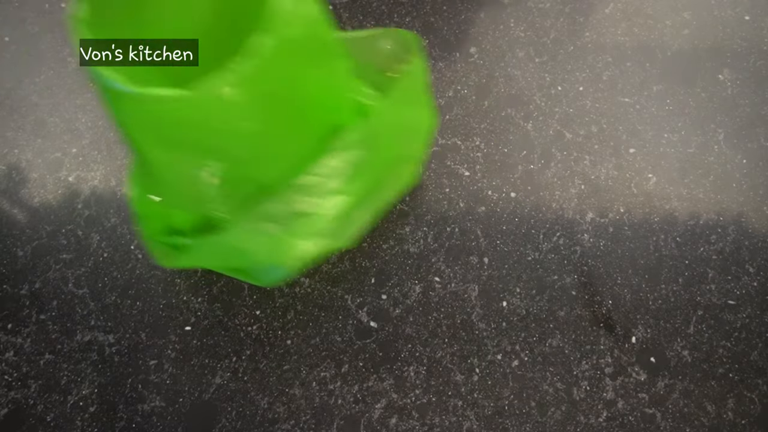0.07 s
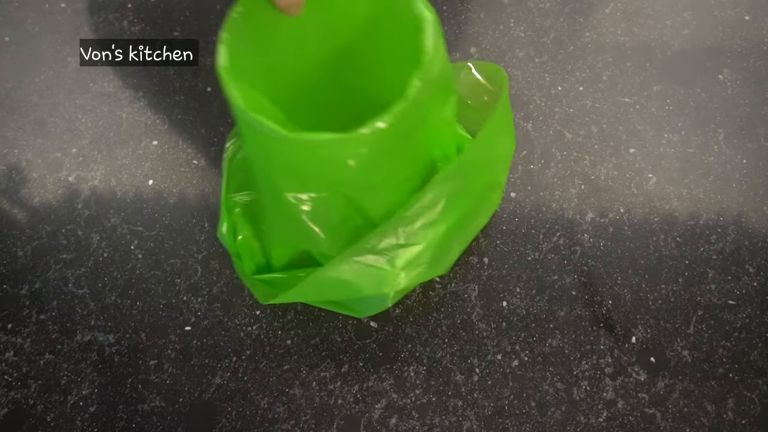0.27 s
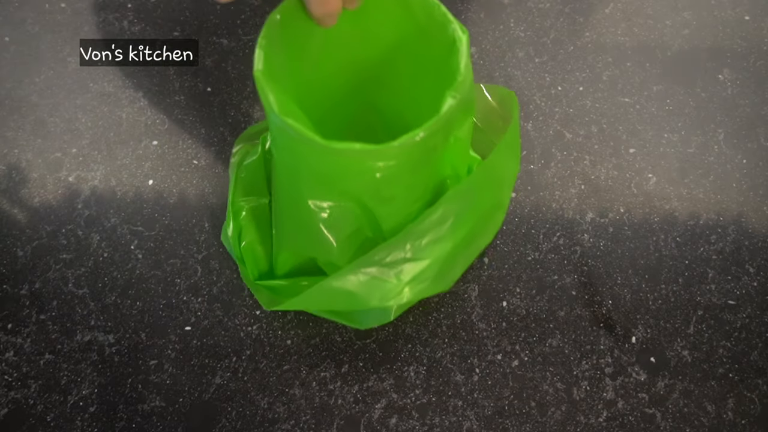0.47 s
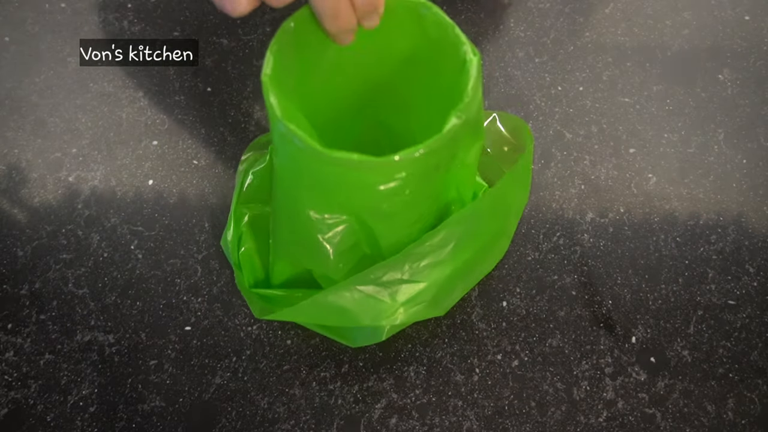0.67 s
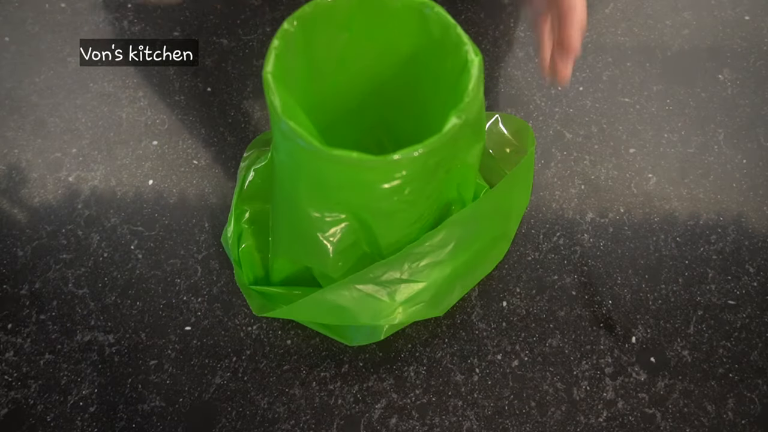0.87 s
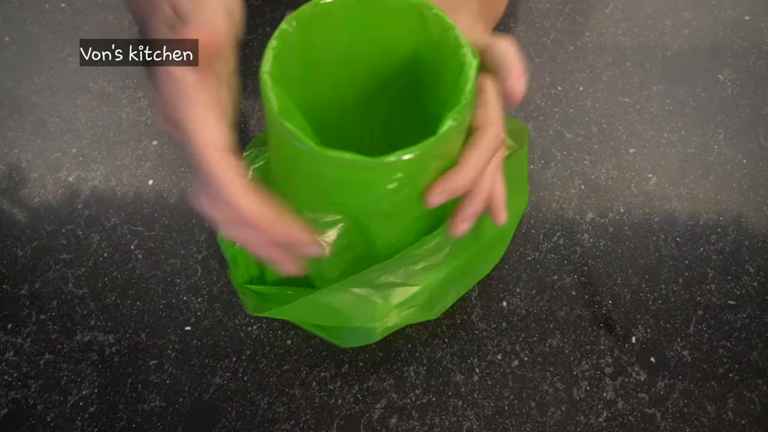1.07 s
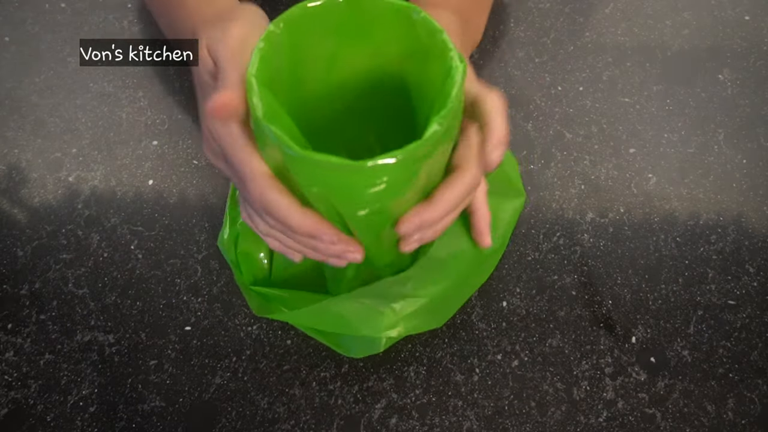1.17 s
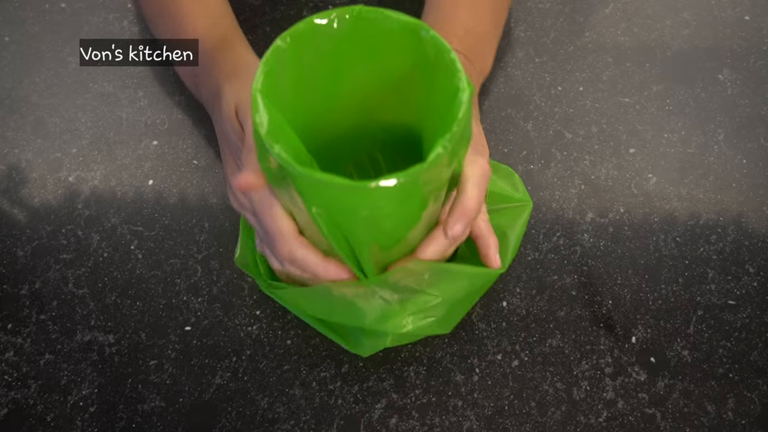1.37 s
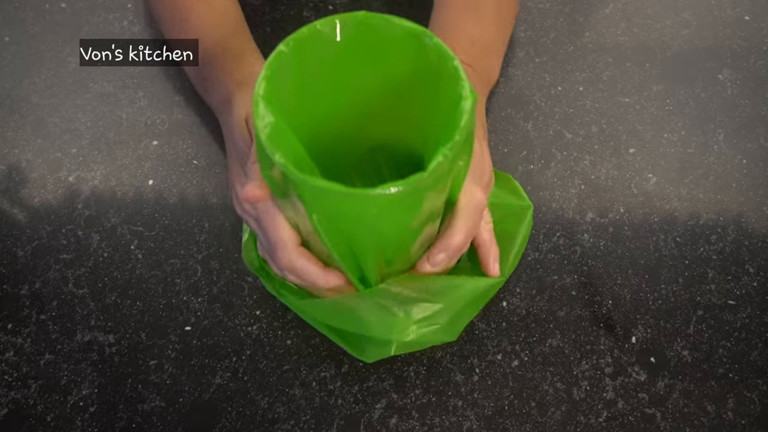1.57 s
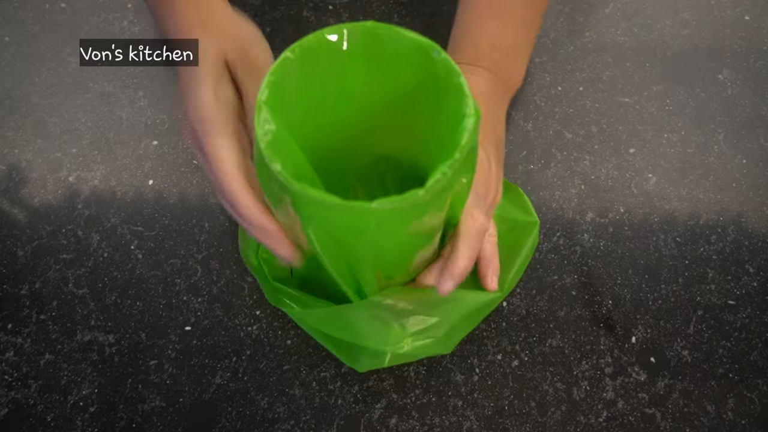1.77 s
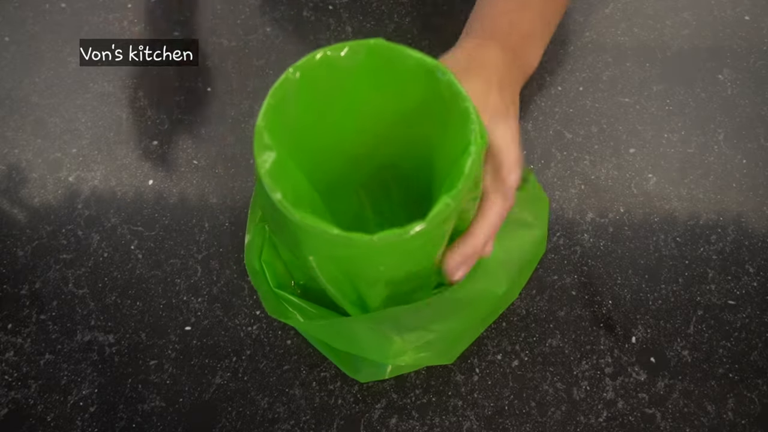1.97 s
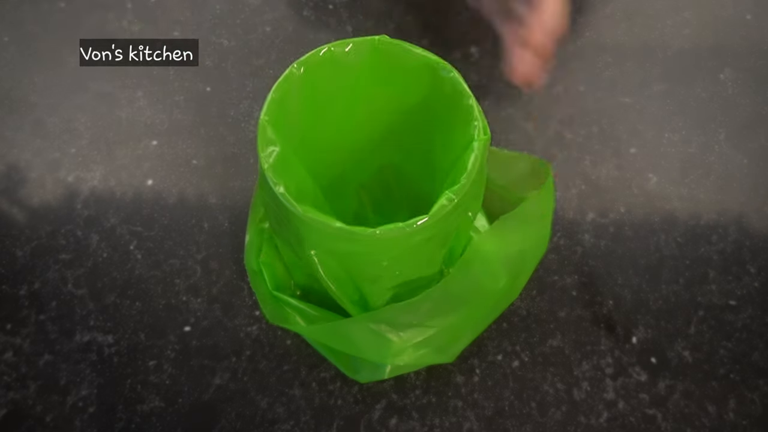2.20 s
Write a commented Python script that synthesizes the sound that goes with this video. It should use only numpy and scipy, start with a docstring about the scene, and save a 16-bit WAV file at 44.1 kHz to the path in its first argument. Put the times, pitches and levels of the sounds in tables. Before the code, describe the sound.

A cup taps and scrapes on a counter, then thin plastic film crackles under pressing hands

```python
"""In a quiet kitchen, over air noise and a faint hum, a bag-lined cup lands on a stone counter. It rings as a
few fading tones, then slides: rough noise shakes the same tones. Two hands press the thin plastic bag around
the cup: creases snap as short rings with bright bursts, over many tiny crackles and a rustle. The hands bump
softly against the cup with low thumps. Two close microphones listen from above, and the room answers with a
fading tail."""
import sys
import numpy as np
from scipy import signal
from scipy.fft import rfft, irfft, next_fast_len
from scipy.io import wavfile
from scipy.ndimage import uniform_filter1d, map_coordinates

SR = 44100
rng = np.random.default_rng(int(sys.argv[2]) if len(sys.argv) > 2 else 0)


def int16_out(signal):
    """Quantize to a 16-bit WAV file."""
    q = np.round(np.clip(np.atleast_2d(signal).T, -1, 1) * 32767)
    wavfile.write(sys.argv[1], SR, q.astype(np.int16))


def elevation(decibels):
    """Turn decibel levels (scalar or array-like) into linear amplitude ratios."""
    levels = np.asarray(decibels, float)
    return 10 ** (levels / 20)


N = 98607  # length [samples]

# Noise color of kitchen air and microphone hiss: (frequency [Hz], level per Hz [dB])
AIR_COLOR = [(25, -23), (55, -5), (130, -10), (350, -10.5), (700, -21), (3000, -24.5), (16000, -34.5)]
# How alike the air is at left and right: (frequency [Hz], likeness [0 to 1])
AIR_LIKENESS = [(300, .99), (3000, .5)]
AIR_DB = -55
HUM_HZ, HUM_DB = 100, -59.5

# How long the kitchen's answer lasts: (frequency [Hz], time to fall 60 dB [s])
ROOM_DECAY = [(500, 0.72), (10000, 0.075)]
# How alike rustle and room are at left and right: (frequency [Hz], likeness [0 to 1])
LIKENESS = [(400, 0.96), (2400, 0.72), (10000, 0.25)]
ROOM_DB = -6

# Ringing tones of the cup:
# (frequency [Hz], struck level [dB], time to fall 60 dB [s], scraped level [dB])
CUP_MODES = [(231, -19.5, 0.13, -15.5), (436, 2.5, 0.043, 2.5), (543, 7.5, 0.023, -3.5),
             (740, 4.5, 0.022, -11.5), (995, -2.5, 0.02, -13), (1341, -4.5, 0.051, -10),
             (2435, -6, 0.052, -6), (4030, -20.5, 0.048, -21)]
# The cup scrapes over stone: (time [s], level [dB])
SCRAPE_LEVEL = [(.44, -29.5), (.54, -51), (.62, -42), (.69, -47), (.76, -55)]
# Soft bumps of the hands against the cup: (time [s], level [dB], frequency [Hz])
HAND_BUMPS = [(.328, -35, 455), (.7218, -24, 760), (.7815, -27, 880), (1.133, -15.5, 450),
              (1.312, -12, 860), (1.351, -15, 560), (1.768, -33.5, 122)]
TAP_S, TAP_DB = .4335, -18
WALL_HZ, STIFFENS = 2000, 1.05  # modes above this pitch rise toward this factor over the slide
PUSH_CYCLES = 2.92  # cycles for a push to fall by e squared

# How hard the film is worked: (time [s], crackle level [dB], treble brightness [dB])
HANDLING_CURVE = [(.43, -48.5, 17), (.455, -61.5, 19.5), (.58, -73, 35), (.615, -40, 5), (.65, -81, 42),
                  (.79, -54, 7.5), (1.024, -66.5, 14), (1.032, -53.5, 22), (1.115, -37, 0),
                  (1.135, -25, -0.5), (1.2, -28.5, 2), (1.3, -32, 10), (1.44, -26, 4), (1.55, -30.5, 5.5),
                  (1.66, -42, 12.5), (1.725, -29, 4), (1.78, -34.5, 11), (1.85, -38, 7), (1.975, -29, 4),
                  (2.05, -47.5, 12.5), (2.14, -46.5, 1.5), (2.27, -58, 0)]
# Noise color of the film's rustle: (frequency [Hz], level per Hz [dB])
RUSTLE_COLOR = [(600, 14), (3000, 8), (15000, -4)]
CRACKLES_PER_S = 1500
CRACKLE_HZ, CRACKLE_OCTAVES = 2874, 1.185  # middle pitch and its spread
CRACKLE_CYCLES = 2.44  # cycles for a crackle to fall by e squared
SIZE_SPREAD_DB, CRACKLE_PAN_DB = 6, -1
GRAIN_GROWS = 0.15  # crackle gain over rustle [dB per dB of handling]
RUSTLE_DB = -0.5
TREBLE_HZ = 5250

# The loudest crease snaps:
# (time [s], level [dB], ring frequency [Hz], treble burst over the ring [dB])
CREASE_SNAPS = [(0.3275, -27.5, 2490, -1), (0.7214, -22, 2804, -3), (0.7824, -24.5, 3120, 4.5),
                (0.9498, -33, 2030, -30), (1.119, -25, 3180, 12), (1.1322, -11, 2800, 8),
                (1.1454, -14, 3180, 3), (1.1651, -37.5, 790, 32), (1.1827, -22, 3130, -18),
                (1.2104, -17.5, 2720, 16.5), (1.2299, -14, 3440, 12.5), (1.2545, -15, 1890, 12.5),
                (1.2853, -19, 1460, 17.5), (1.293, -14.5, 2670, 6.5), (1.3216, -18, 2250, 9.5),
                (1.3322, -16.5, 3020, 10.5), (1.3555, -14.5, 3205, -22), (1.4013, -33, 1100, 27.5),
                (1.4146, -27.5, 5020, 22), (1.4354, -17, 2890, 18), (1.4439, -13, 2730, -23),
                (1.446, -23, 3420, 22), (1.457, -18.5, 4400, 18), (1.4855, -14.5, 1035, 8.5),
                (1.4961, -10.5, 2720, 7.5), (1.5315, -12, 3650, 1), (1.5453, -14.5, 2350, 7.5),
                (1.5688, -19, 917, -17), (1.5883, -33, 2060, -25), (1.604, -9.5, 4430, 3.5),
                (1.6196, -16.5, 1700, 10.5), (1.6819, -19.5, 2980, 4), (1.7031, -16, 7350, 11.5),
                (1.718, -19.5, 1640, 20), (1.7281, -13, 9180, 8.5), (1.7504, -16, 5610, 12),
                (1.7891, -20.5, 1380, 5), (1.8603, -21, 6140, 11), (1.9029, -24.5, 3090, 9),
                (1.9157, -25.5, 2020, 18), (1.9704, -16, 1554, 8.5), (2.03, -21.5, 3214, 7.5),
                (2.081, -26.5, 2720, -4)]
SNAP_CYCLES = 4  # cycles for a ring to fall by e squared
RISE_S, BURST_S = .0002, .0011
FLUTTER_S, FLUTTER_DB = 0.0026, -7.5
THIN_HZ, DULL_HZ = 481, 12900  # the film weakens sound below the first and above the second

TILT_DB = 1.5  # left minus right in the treble
TOP_HZ = 15500


def unit(x):
    """Scales to an average strength (rms) of 1."""
    return x / np.sqrt(np.mean(x ** 2) + 1e-20)


def along(points, hz):
    """Reads a curve of (frequency [Hz], value) points on a log frequency axis."""
    f, value = np.transpose(points)
    return np.interp(np.log(hz + 1), np.log(f + 1), value)


def curves(rows):
    """Gives one value per sample for each column after the time; -120 outside the times."""
    s, *columns = np.transpose(rows)
    t = np.arange(N) / SR
    return [np.interp(t, s, column, left=-120, right=-120) for column in columns]


def wobble(rate):
    """Draws a smooth random curve with this many knots a second."""
    knots = rng.standard_normal(int(N * rate / SR) + 4)
    return map_coordinates(knots, [np.arange(N) * rate / SR])


def filtered(x, response):
    """Changes each frequency of x by a complex response."""
    m = next_fast_len(N + 8192)
    return irfft(rfft(x, m) * response(np.fft.rfftfreq(m, 1 / SR)), m)[..., :N]


def rush(color, alike):
    """Makes stereo noise of rms 1; the mix of mid and side sets how alike the two sides are."""
    def mid_and_side(hz):
        turn = np.arccos(np.clip(along(alike, hz), -1, 1)) / 2
        return elevation(along(color, hz)) * [np.cos(turn), np.sin(turn)]

    mid, side = filtered(rng.standard_normal((2, N)), mid_and_side)
    return unit(np.array([mid + side, mid - side]))


def placed(s, shapes, pan_db):
    """Adds up short shapes at their times, each panned by a left-right level difference."""
    starts = np.round(s * SR).astype(int)
    at = (starts[:, None] + np.arange(shapes.shape[1])).ravel()
    sides = []
    for side in (1, -1):
        panned = shapes * elevation(side * pan_db / 2)[:, None]
        sides.append(np.bincount(at, panned.ravel(), N + SR)[:N])
    return np.array(sides)


def kitchen_air():
    """Steady air and hiss are colored noise; the mains hum is a slightly unsteady sine."""
    level = elevation(HUM_DB + wobble(10.1))
    hum = level * np.sin(2 * np.pi * HUM_HZ * np.arange(N) / SR + wobble(5.02))
    return elevation(AIR_DB) * rush(AIR_COLOR, AIR_LIKENESS) + hum


def room(x):
    """The kitchen's answer is a noise tail in which each frequency dies at its own speed."""
    hz, t, z = signal.stft(rng.standard_normal((2, SR // 2)), SR, nperseg=256)
    # one shared noise, plus a second one with opposite sign at left and right
    apart = np.sqrt(1 / np.clip(along(LIKENESS, hz), .2, 1) - 1)
    z = z[0] + apart[:, None] * z[1] * [[[1]], [[-1]]]
    fading = z * elevation(-60 * t / along(ROOM_DECAY, hz)[:, None])
    tail = signal.istft(fading, SR, nperseg=256)[1]
    tail = tail / np.linalg.norm(tail[0])
    delayed = np.pad(x.mean(axis=0), (90, 0))[None]
    return signal.fftconvolve(delayed, tail, axes=1)[:, :N]


def cup_ring(t):
    """Landing on stone sets off the cup's tones, each dying at its own speed."""
    ring = 0
    for hz, db, t60, _ in CUP_MODES:
        ring = ring + elevation(TAP_DB + db - 60 * t / t60) * np.sin(2 * np.pi * hz * t)
    return ring * (1 - np.exp(-t / 0.0012))


def cup_scrape(t):
    """Rough noise drives the cup's resonances; those of the wall rise in pitch over the slide."""
    def body(f, up):
        total = 0
        for k, (hz, _, t60, db) in enumerate(CUP_MODES):
            center = hz * (up if hz > WALL_HZ else 1)
            width = np.log(1000) / np.pi / t60  # a faster decay means a wider resonance
            mode = 1j * f * width / (center * center - f * f + 1j * f * width)
            total = total + (-1) ** k * elevation(db) * mode
        return total

    grit = rng.standard_normal(N) * elevation(2.5 * wobble(150))
    late = np.minimum(t / (SCRAPE_LEVEL[2][0] - TAP_S), 1)
    early_sound = filtered(grit, lambda f: body(f, 0.99))
    late_sound = filtered(grit, lambda f: body(f, STIFFENS))
    scrape = np.sqrt(1 - late) * early_sound + np.sqrt(late) * late_sound
    return elevation(curves(SCRAPE_LEVEL)[0]) * unit(scrape)


def hand_bumps():
    """Each soft bump of a hand against the cup is a low tone that dies within a few cycles."""
    pushes = 0
    for s, db, hz in HAND_BUMPS:
        t = np.maximum(np.arange(N) / SR - s, 0)
        fade = np.tanh(2 * hz * t) * np.exp(-2 * t * hz / PUSH_CYCLES)
        pushes = pushes + elevation(db) * np.sin(2 * np.pi * hz * t) * fade
    return pushes


def cup():
    """The cup's ring and scrape share the same tones; the hands' bumps join them, equal on both sides."""
    t = np.maximum(np.arange(N) / SR - TAP_S, 0)
    return np.tile(cup_ring(t) + hand_bumps() + cup_scrape(t), (2, 1))


def crackle():
    """Many small creases of scattered size and pitch over a fine rustle, both following the hands."""
    level_db, bright_db = curves(HANDLING_CURVE)
    u = rng.random((int(CRACKLES_PER_S * N / SR), 3))  # time, size, phase
    z = rng.standard_normal((len(u), 2))  # pitch, pan
    hz = np.clip(CRACKLE_HZ * 2 ** (CRACKLE_OCTAVES * z[:, :1]), 300, 15000)
    t = np.arange(200) / SR
    size = elevation(np.minimum(-SIZE_SPREAD_DB * np.log(u[:, 1:2]), 20))
    grains = size * np.sin(2 * np.pi * (hz * t + u[:, 2:])) * np.exp(-2 * t * hz / CRACKLE_CYCLES)
    grains = unit(placed(u[:, 0] * N / SR, grains, CRACKLE_PAN_DB * z[:, 1]))
    # harder handling brings the crackles out over the rustle
    grains = grains * elevation(GRAIN_GROWS * (level_db - level_db.max()))
    film = grains + elevation(RUSTLE_DB) * rush(RUSTLE_COLOR, LIKENESS)
    treble = filtered(film, lambda f: f ** 2 / (f ** 2 + TREBLE_HZ ** 2))
    film = film - treble + elevation(np.maximum(bright_db, -20)) * treble
    return elevation(level_db + 2.26 * wobble(50.21)) * film


def snaps():
    """A crease flips: the panel rings briefly, a bright burst flies off, the film flutters after."""
    s, db, hz, bright_db = np.transpose(CREASE_SNAPS)
    t = np.arange(700) / SR
    noise = rng.standard_normal((len(s), 4, len(t)))
    pan_db = 2.33 * noise[:, 3, 0]
    rise = 1 - np.exp(-t / RISE_S)

    ring = np.sin(2 * np.pi * hz[:, None] * t) * np.exp(-2 * t * hz[:, None] / SNAP_CYCLES)
    # slow noise carried on the ring's pitch
    flutter = elevation(FLUTTER_DB) * uniform_filter1d(noise[:, 0], size=19) * 6
    flutter = flutter * np.cos(2 * np.pi * hz[:, None] * t) * np.exp(-t / FLUTTER_S)
    panel = placed(s, elevation(db)[:, None] * 2 * rise * (ring + flutter), pan_db)

    size = elevation(db + bright_db)[:, None] * 2 * rise * np.exp(-t / BURST_S)
    burst = placed(s, size * noise[:, 1], 2 * pan_db)
    # a weaker burst with opposite sign at left and right
    burst = burst + elevation(-7.0) * placed(s, size * noise[:, 2], pan_db) * [[1], [-1]]
    bright = filtered(burst, lambda f: (1j * f / TREBLE_HZ) ** 2 / (1 + 1j * f / TREBLE_HZ) ** 3)
    return panel + bright


def radiated(film):
    """A thin light sheet moves little air in the bass and softens the top."""
    def response(f):
        bass_loss = (1j * f / THIN_HZ / (1 + 1j * f / THIN_HZ)) ** 3
        return bass_loss / (1 + 1j * f / DULL_HZ) ** 3

    return filtered(film, response)


def scene():
    """Adds the sources on the counter, the room's answer to them and the kitchen air."""
    near = radiated(snaps() + crackle()) + cup()
    return near + elevation(ROOM_DB) * room(near) + kitchen_air()


def low_pass(x):
    """Removes everything above the highest recorded frequency."""
    return signal.sosfilt(signal.butter(12, 16790, fs=SR, output="sos"), x)


def record(dry):
    """Two microphones hear slightly unequal treble, and nothing from TOP_HZ upward."""
    def microphones(hz):
        tilt_db = TILT_DB * np.tanh(hz / TREBLE_HZ) / 2
        return elevation(tilt_db * np.array([[1], [-1]])) * (hz < TOP_HZ)

    mix = filtered(dry, microphones)
    return low_pass(mix)


dry = scene()
out = record(dry)
int16_out(out)
```